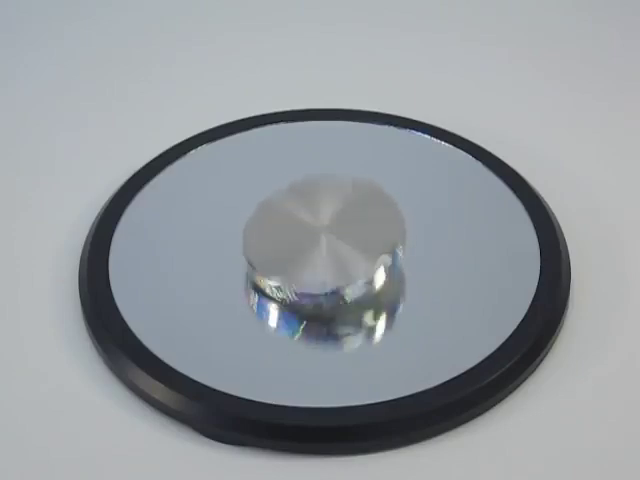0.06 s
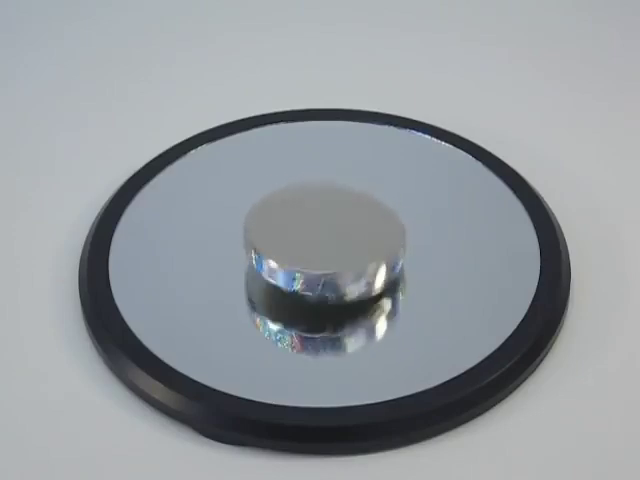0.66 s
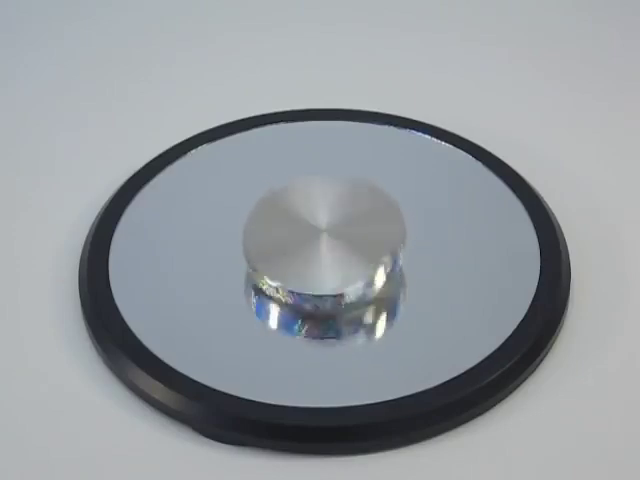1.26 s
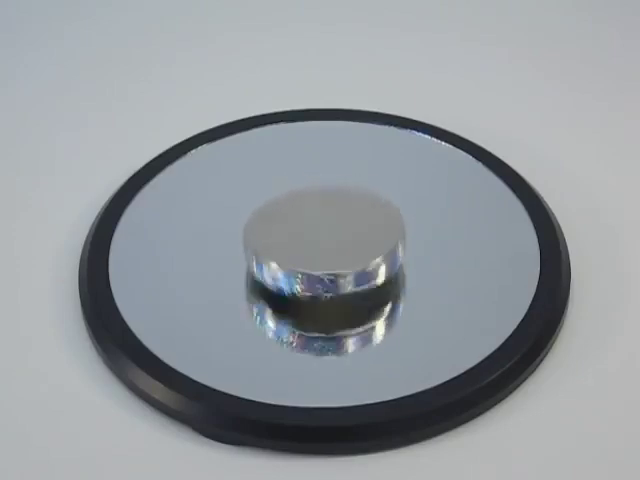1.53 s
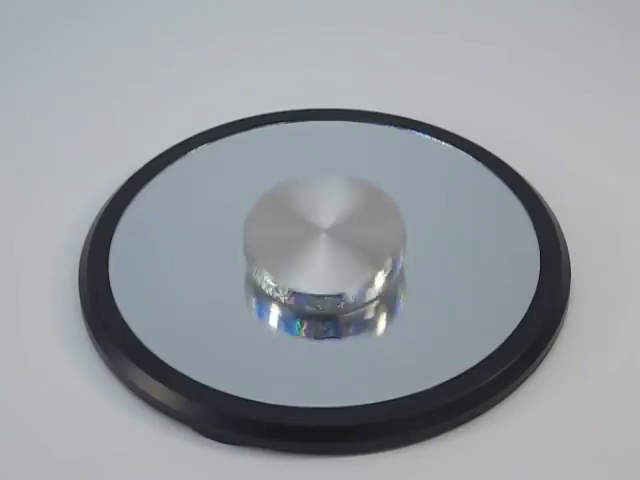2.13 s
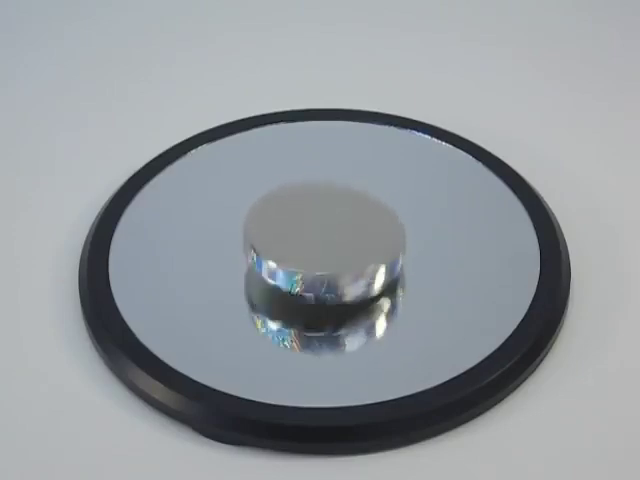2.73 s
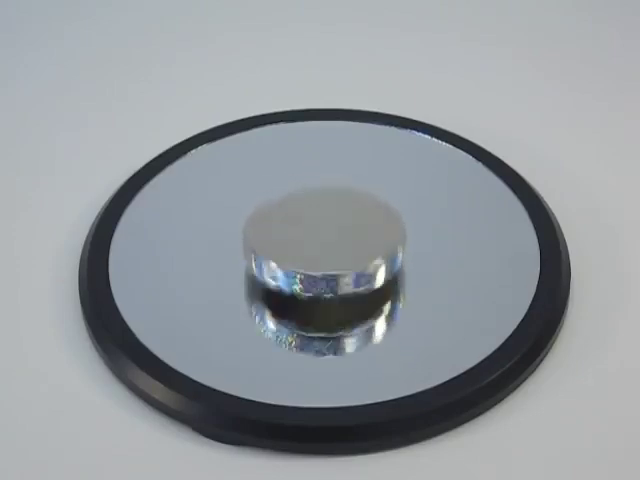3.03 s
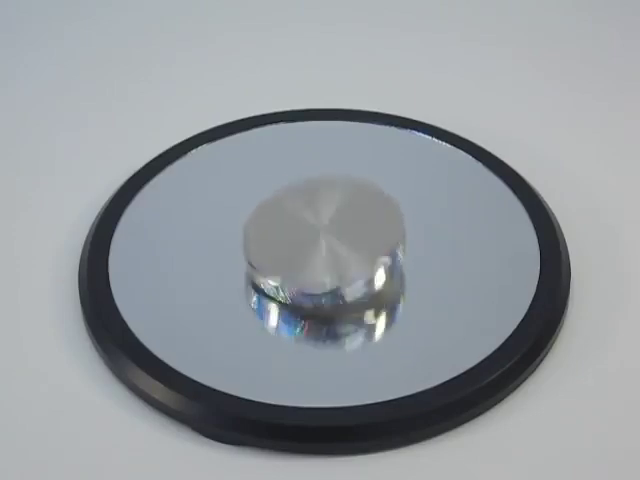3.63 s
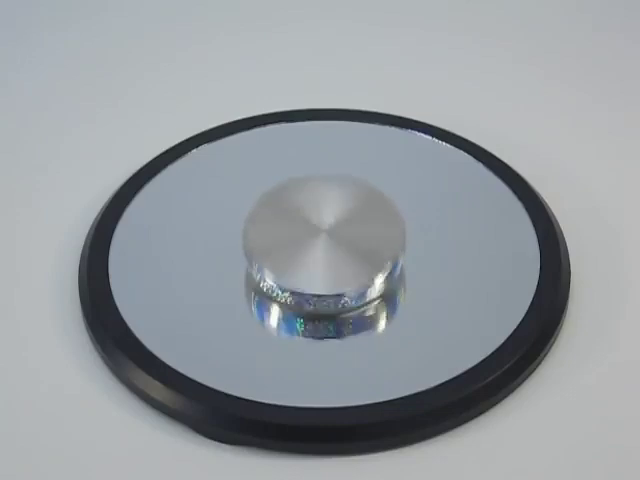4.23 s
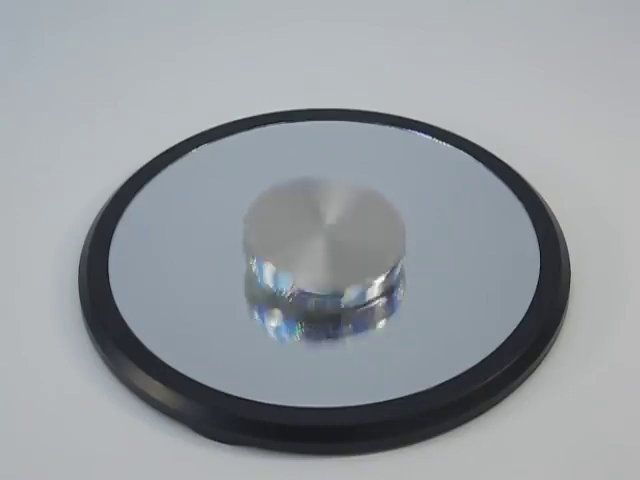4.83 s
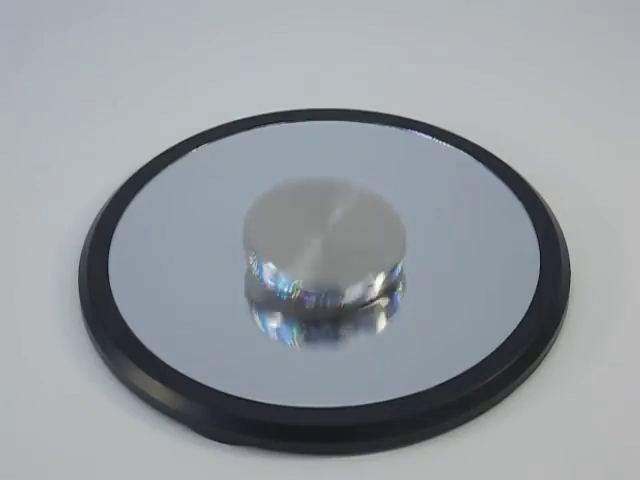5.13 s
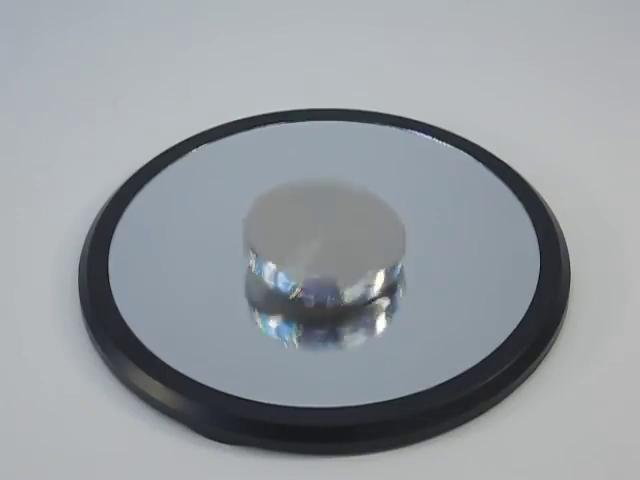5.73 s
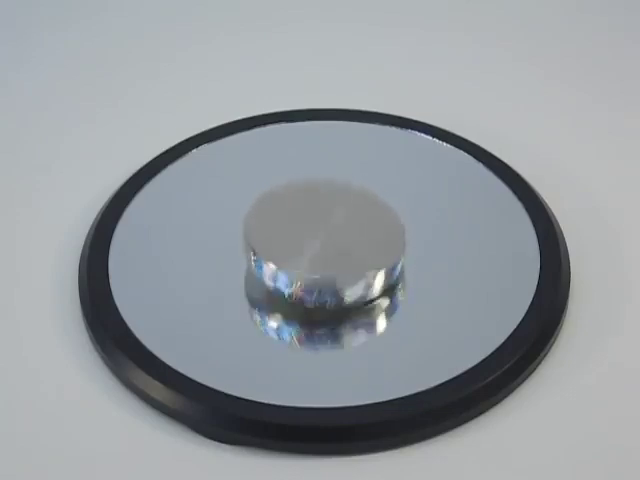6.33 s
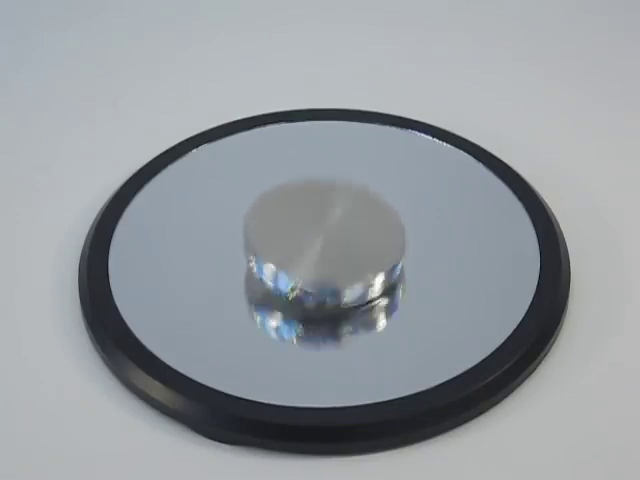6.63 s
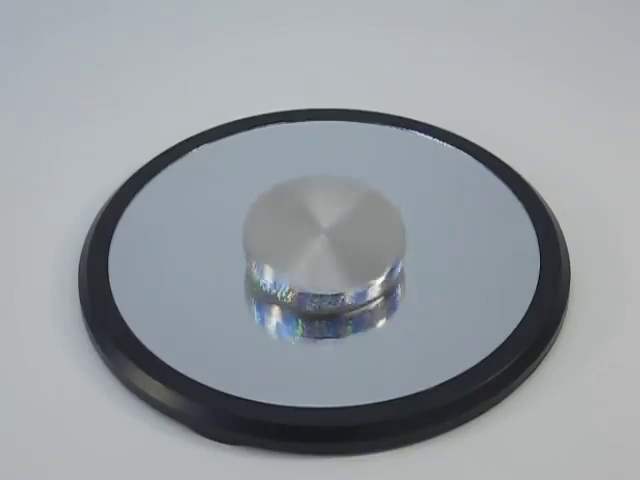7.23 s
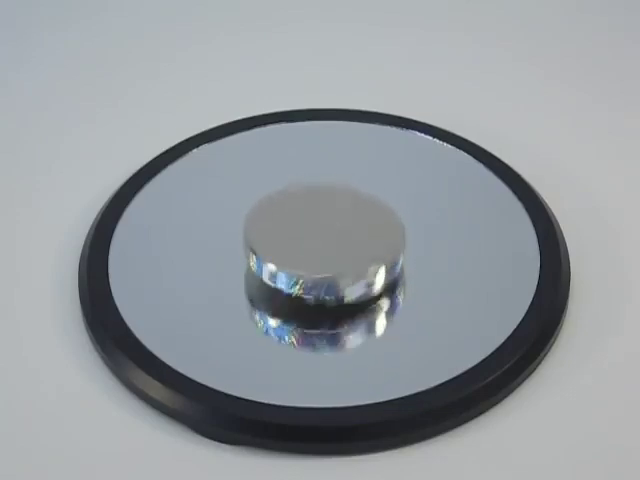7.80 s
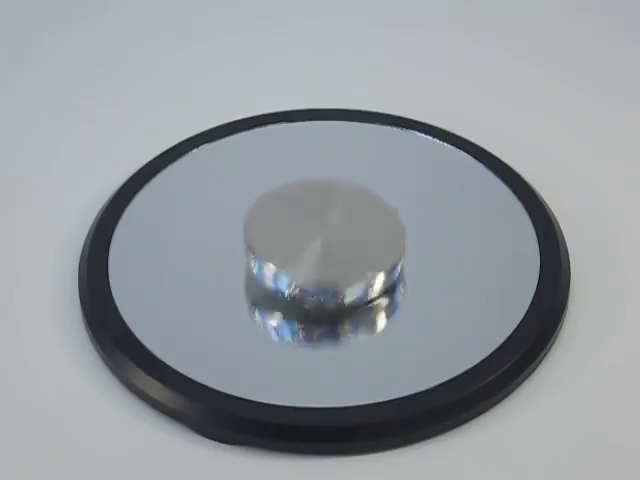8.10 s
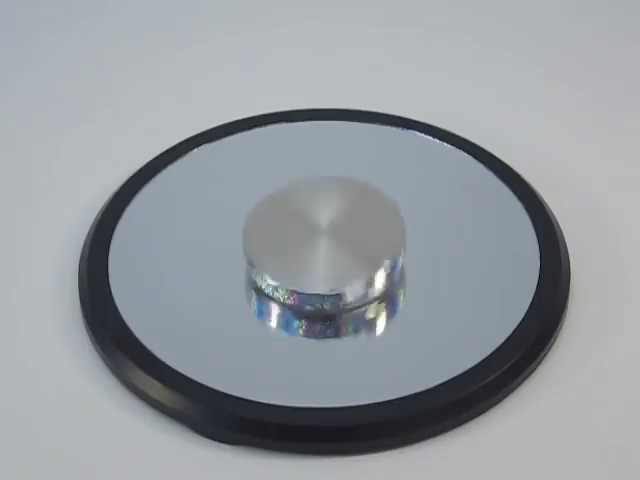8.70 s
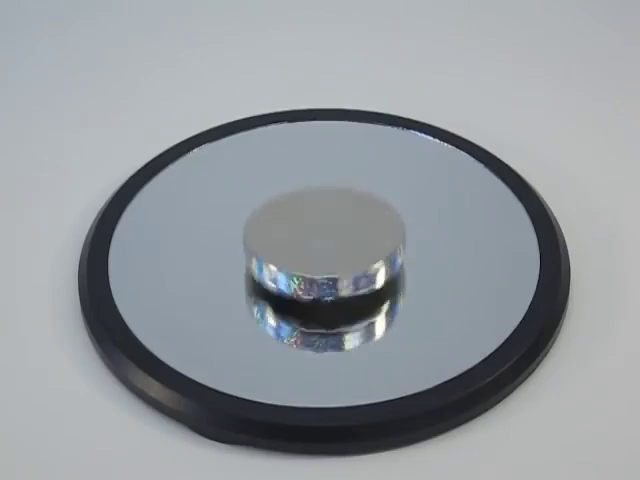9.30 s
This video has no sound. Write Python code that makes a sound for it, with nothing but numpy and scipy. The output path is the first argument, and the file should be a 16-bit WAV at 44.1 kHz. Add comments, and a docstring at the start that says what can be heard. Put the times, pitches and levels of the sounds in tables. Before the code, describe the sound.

Close, rapid metallic whirring and pulsing from a steel disc rolling round on its rim on a mirror, in a quiet room.

```python
"""First comes a fast, rasping warble: a heavy steel disc wobbling on a mirror base, close to one microphone.
Its contact circles about 13 times a second, slowly speeding up, driving the plate's modes, each loudest
at its own places on the circle, and hissing over a scuffed spot. A rough arc of the rim rasps once a turn
until the sinking disc rolls off it. Farther back lies a quiet room with a few soft bumps."""
import sys
import numpy as np
from scipy import signal
from scipy.fft import rfft, irfft, next_fast_len
from scipy.io import wavfile
from scipy.ndimage import uniform_filter1d, map_coordinates

SR = 44100
rng = np.random.default_rng(int(sys.argv[2]) if len(sys.argv) > 2 else 0)


def master(y):
    """Save y as 16-bit WAV."""
    cut = np.clip(np.atleast_2d(y).T, -1, 1)
    pcm = np.round(cut * 32767)  # scale
    wavfile.write(sys.argv[1], SR, pcm.astype(np.int16))


N = 412776
TIME = np.arange(N) / SR


def amp(db):
    """Decibels to gain."""
    return 10 ** (np.asarray(db) / 20)


def unit(x):
    """x at rms 1."""
    return x / np.sqrt(np.mean(x ** 2) + 1e-20)


def along(points, hz):
    """(Hz, value) points read on a log axis."""
    f, v = np.transpose(points)
    return np.interp(np.log(hz + 1), np.log(f + 1), v)


def white():
    """Noise of 0 dB per Hz."""
    return rng.standard_normal(N) * np.sqrt(SR / 2)


def wander(rate):
    """A smooth random curve with rate knots a second."""
    return map_coordinates(rng.standard_normal(int(TIME[-1] * rate) + 4), [TIME * rate])


def filtered(x, response):
    """x times a complex response of frequency."""
    m = next_fast_len(N + SR // 2, real=True)
    return irfft(rfft(x, m) * response(np.fft.rfftfreq(m, 1 / SR)), m)[:N]


def coloured(x, spectrum):
    """x with the gains of (Hz, dB) points."""
    return filtered(x, lambda f: amp(along(spectrum, f)))


def resonate(x, hz, width):
    """x through a steep-sided resonance."""
    return filtered(x, lambda f: (1j * f * width / (hz * hz - f * f + 1j * f * width)) ** 2)


def turns(start, rate, speed_up, growth):
    """Turns travelled by the contact, from rate turns a second, ever faster as the disc sinks."""
    return start + rate * TIME + speed_up * TIME ** 2 / 2 + growth * TIME ** 3 / 6


def patch(turn, centre, half_width, order=2):
    """1 while the contact is on a stretch of its circle, 0 away from it."""
    return np.exp(-np.abs(((turn - centre + .5) % 1 - .5) / half_width) ** order / 2)


def coupling(turn, waves, best, share):
    """How well a mode is driven as the contact crosses its crests and nodes."""
    return 1 - share + share * np.cos(2 * np.pi * round(waves) * (turn - best))


def grit(turn, spiky_db, repeat, marks_per_lap=3600):
    """Contact force of 0 dB per Hz: clumped impacts on marks that recur, renewed as the track creeps."""
    clumps = unit(uniform_filter1d(rng.standard_normal(N), size=24))
    fresh = rng.standard_normal((int(turn[-1]) + 20, marks_per_lap))
    laps = signal.lfilter([np.sqrt(1 - repeat ** 2)], [1, -repeat], fresh, axis=0)
    marks = laps.ravel()[((turn + 10) * marks_per_lap).astype(int)]
    return unit(marks * amp(spiky_db * clumps)) * np.sqrt(SR / 2)


# The room's air: f/Hz, level/dB per Hz
ROOM_AIR = [(15, -74), (35, -67.5), (60, -71), (90, -75), (160, -77.5), (250, -78), (320, -81), (520, -83),
            (1000, -86), (4000, -111.5), (15000, -108)]
# Its hum: f/Hz, level/dB
ROOM_HUM = [(53, -57.5), (120, -66.5), (263, -63)]
def room_tone():
    """All round the microphone: still air, a faint hum and a low rumble that swells once."""
    peak_s, half_length_s = 4.5, 1.57
    swell = amp(-54.5) * np.exp(-((TIME - peak_s) / half_length_s) ** 2 / 2)
    rumble = swell * unit(resonate(white(), hz=73.6, width=166))
    hum = sum(amp(db) * np.sqrt(2) * np.sin(2 * np.pi * (hz * TIME + rng.random()))
              for hz, db in ROOM_HUM)
    return coloured(white(), ROOM_AIR) + rumble + hum


# Soft bumps: t/s, f/Hz, width/Hz, envelope level/dB, t60/s
ROOM_BUMPS = [(3.805, 380, 260, -35, .3), (3.85, 200, 22, -46, .7), (5.51, 285, 22, -39, .4),
              (7.44, 1000, 900, -30, .15)]
def bumps():
    """Dull knocks, back in the room, that swell briefly and die away."""
    out = np.zeros(N)
    for start, hz, width, db, t60 in ROOM_BUMPS:
        age = np.maximum(TIME - start, 0)
        envelope = amp(db - 60 * age / t60) * (1 - np.exp(-age / 0.011))
        out += envelope * unit(resonate(white(), hz, width))
    return out


# Decay of the room: f/Hz, t60/s
WALL_DECAY = [(200, 1), (2000, 0.36), (12000, 0.54)]
def walls(x):
    """The walls' short answer reaches the microphone 5 ms late and lingers longest in the bass."""
    hz, t, spectra = signal.stft(rng.standard_normal(SR // 2), SR, nperseg=256)
    decay = amp(-60 * t / along(WALL_DECAY, hz)[:, None])
    tail = signal.istft(spectra * decay, SR, nperseg=256)[1]
    return signal.fftconvolve(x, np.pad(tail / np.linalg.norm(tail), (SR // 200, 0)))[:N]


# Waviness of the rim: waves round it, drive level/dB, beats per turn of drift, loudest drift/turn
RIM_WAVINESS = [(31, -49.5, 2, 0.25), (32, -58, 3, 0.092), (33, -49.5, 3, 0.14), (34, -57, 2, 0.28),
                (35, -50.5, 2, .3), (36, -51, 2, .3)]
def base_ring(mirror, rim):
    """Under the disc, rim waves glide up through the base's lowest mode, beating as the rim drifts."""
    drive = amp(-64.5) * grit(rim, spiky_db=2, repeat=0.7)
    for waves, db, beats, best in RIM_WAVINESS:
        beat = coupling(mirror - rim, beats, best, share=0.41)
        drive += amp(db) * beat * np.sqrt(2) * np.sin(2 * np.pi * (round(waves) * rim + rng.random()))
    return resonate(drive * coupling(mirror, 1, best=0.94, share=0.34), hz=417.2, width=35.7)


# Specks on the mirror: from t/s, to t/s, place/turn, relative level/dB
MIRROR_SPECKS = [(1.2, 4.9, .255, -25), (5.0, 7.4, .16, -23.5)]
# Colour of their click: f/Hz, level/dB
CLICK_COLOUR = [(600, -22), (1500, -1), (3000, 0), (5000, -7), (9000, -13), (15000, -19)]
def ticks(mirror, rim):
    """Specks click under the contact once a lap, and a nick in the rim adds a thin high tick."""
    blows = np.zeros(N)
    for start, stop, turn, db in MIRROR_SPECKS:
        hits = np.flatnonzero(np.diff(np.floor(mirror - turn)))
        sizes = amp(db + 13.5) * (1 + rng.uniform(-0.43, 0.74, len(hits)))
        blows[hits] += sizes * (TIME[hits] > start) * (TIME[hits] < stop)
    t = TIME[:SR // 50]
    chatter = rng.standard_normal(len(t)) * amp(-60 * t / 0.01)
    clicks = coloured(signal.fftconvolve(blows, chatter / np.linalg.norm(chatter))[:N], CLICK_COLOUR)
    nick = np.interp(TIME, [1.5, 3, 6.5, 8], [0, 1, 1, 0]) * patch(rim, centre=0.145, half_width=0.016)
    return clicks + amp(-74) * resonate(white() * nick, hz=12300, width=890)


def rough_arc(rim):
    """Roughness under the contact: the sinking disc rolls on ever less of the arc, then leaves it."""
    life_s, fade_db = 5.7, 14.5
    age = TIME / life_s
    centre = -0.011 - 0.15 * age ** 2
    half_width = np.maximum(0.19 - 0.13 * age, .03)
    return amp(-.5 - fade_db * age ** 4) * patch(rim, centre, half_width, order=3)


def reflection(x, mirror, delay_s, swing, farthest, echo):
    """A bounce off disc and mirror whose path to the microphone changes round the lap: a swooping comb."""
    lag = delay_s * (1 + swing * np.cos(2 * np.pi * (mirror - farthest)))
    return (x - echo * map_coordinates(x, [(TIME - lag) * SR])) / np.sqrt(1 + echo ** 2)


# The contact on smooth rim, rough arc and scuffed mirror: f/Hz, relative level/dB per Hz
SMOOTH_HISS = [(250, -100), (900, -80.5), (2400, -79.5), (3300, -87), (4600, -87), (5900, -87.5),
               (6500, -83), (8300, -85), (9800, -85), (11000, -87), (12600, -89.5), (14000, -91),
               (15500, -102)]
ARC_RASP = [(500, -111), (850, -69.5), (1050, -68.5), (1800, -57.5), (2400, -70.5), (3200, -72.5),
            (4000, -66), (4700, -73), (5400, -73.5), (7000, -78.5), (8000, -75.5), (10300, -84),
            (12000, -78), (15000, -98)]
SCUFF_SWISH = [(2500, -105), (4600, -81.5), (5200, -70), (5700, -75), (6200, -78), (7200, -74),
               (8300, -73.5), (9500, -83), (12000, -132), (15500, -105)]
def hiss(mirror, rim, rough):
    """Close up: fine hiss, the arc's rasp, and a swish over the scuff, strongest when the arc meets it."""
    all_round = coupling(mirror, 1, best=0.14, share=0.15)
    smooth = coloured(grit(rim, spiky_db=3, repeat=0.68) * all_round, SMOOTH_HISS)
    bite = 0.76 + 0.47 * patch(mirror, centre=0.042, half_width=0.038)
    rasp = coloured(grit(rim, spiky_db=1.5, repeat=0.9) * rough * bite, ARC_RASP)
    scuff = patch(mirror, centre=0.078, half_width=0.047)
    scuff += 0.32 * patch(mirror, centre=0.86, half_width=0.04)
    swish = coloured(grit(mirror, spiky_db=0.5, repeat=0.65) * scuff * (1 + 1.54 * rough), SCUFF_SWISH)
    return swish + reflection(smooth + rasp, mirror, delay_s=0.000561, swing=0.12, farthest=0.66, echo=0.35)


# Bright modes: f/Hz, width/Hz, relative level/dB, crest/turn, half width/turn
BRIGHT_MODES = [(4070, 190, -36, -0.36, 0.059), (3575, 310, -37, -.08, 0.051),
                (2810, 410, -39, 0.19, 0.061)]
def bright_ring(mirror, rough):
    """The rough arc rings each bright mode where it passes over that mode's crest."""
    return rough * sum(amp(db) * patch(mirror, turn, half_width) * unit(resonate(white(), hz, width))
                       for hz, width, db, turn, half_width in BRIGHT_MODES)


# Rippled stretches of the mirror: f/Hz, pitch spread/Hz, relative level/dB, place/turn, half width/turn
MIRROR_RIPPLES = [(1465, 50.2, -37, 0.61, 0.084), (1432, 60.2, -39, 0.068, 0.097),
                  (1960, 110.5, -40.5, 0.83, 0.042), (1855, 110, -45.5, 0.33, 0.059),
                  (1797, 80, -45, .1, 0.029), (2122, 100, -43, .28, 0.047), (655, 69.8, -54, 0.74, 0.066),
                  (3970, 250, -51.5, 0.656, 0.052), (4250, 250, -52, 0.22, 0.05)]
def singing(mirror, force):
    """Each rippled stretch draws a short note from the plate, so that the lap warbles."""
    out = np.zeros(N)
    for hz, spread, db, turn, half_width in MIRROR_RIPPLES:
        pitch = hz + spread / 2 * wander(rate=120)
        envelope = amp(db + 1.5 * wander(rate=3.03)) * patch(mirror, turn, half_width)
        out += envelope * np.sqrt(2) * np.sin(2 * np.pi * np.cumsum(pitch) / SR)
    rise_db = np.interp(TIME, [0, 3.5, 7.5], [-3, -1, 1.5])  # the flatter the disc, the more it sings
    return force * out * amp(rise_db)


# Modes of the steel plate: f/Hz, width/Hz, relative level/dB per Hz, waves round the circle,
# best driven at/turn, share that depends on place/0-1
PLATE_MODES = [(661.5, 110, -72.5, 1, 0.58, 0.28), (940, 54, -74.5, 1, 0.023, 0.95),
               (1025.5, 59, -65.5, 1, 0.18, 0.1), (1077, 53, -71.5, 1, 0.067, 0.06),
               (1201, 42, -64.5, 1, 0.39, 0.52), (1333, 130, -67, 1, 0.016, 0.97),
               (1446, 83, -58, 1, 0.566, 0.77), (1485, 226, -65.5, 1, 0.53, 0.71),
               (1510, 260, -67.5, 1, 0.016, 0.81), (1810, 206, -65.5, 1, 0.18, 0.57),
               (1875, 220, -63, 2, 0.31, 0.74), (1948, 250, -69.5, 1, 0.82, 0.84),
               (2066, 135, -65.5, 1, .31, 0.93), (2166, 115, -74.5, 1, 0.086, 0.22),
               (2782, 410, -78, 1, 0.14, 0.85), (3280, 270, -76, 1, 0.11, 0.77),
               (3685, 310, -78.5, 1, 0.017, 0.68), (3957, 310, -74.5, 1, 0.65, 0.63),
               (4240, 430, -80.5, 1, 0.36, 0.26), (4600, 270, -78, 1, 0.86, 0.5),
               (4826, 190, -77.5, 1, 0.45, 0.52), (5460, 570, -83, 1, 0.49, 1),
               (9740, 790, -82, 1, 0.31, 0.78), (12300, 1800, -86, 1, 0.46, 0.36)]
def plate(mirror, rim, force, rough):
    """Nearest the microphone: marks on rim and mirror ring the modes, each swelling where best driven."""
    drives = []
    for _ in range(3):
        marks = grit(rim, spiky_db=1, repeat=0.96) + 0.7 * grit(mirror, spiky_db=1, repeat=0.96)
        drives.append(0.77 * force * marks)
    out = np.zeros(N)
    for k, (hz, width, db, waves, best, share) in enumerate(PLATE_MODES):
        # the arc's fine grain hardly stirs the lowest mode
        stir = np.interp(hz, [650, 950, 1490, 2130, 2700, 5000], [0.24, 1.35, 0.98, 0.88, 1.16, 1.0])
        drive = drives[k % len(drives)] * (1 + 1.42 * rough * stir)
        out += amp(db) * resonate(drive * coupling(mirror, waves, best, share), hz, width)
    return out


def scene():
    """The disc on its base in front, the room well behind."""
    slip = .003 * wander(rate=2)  # no lap is quite as long as the last
    # the contact's place on the mirror and on the rim, in turns
    mirror = turns(start=-.560, rate=12.3162, speed_up=.14316, growth=.00855) + slip
    rim = turns(start=-.293, rate=11.7606, speed_up=.15663, growth=.00801) + slip
    rough = rough_arc(rim)
    force = amp(.5 - 0.1026 * TIME)  # the rolling force slowly ebbs
    disc = plate(mirror, rim, force, rough) + singing(mirror, force) + bright_ring(mirror, rough)
    disc += force * hiss(mirror, rim, rough) + ticks(mirror, rim)
    return (disc + amp(-15.5) * walls(disc) + base_ring(mirror, rim) + bumps() + room_tone())[None]


def record(dry):
    """One microphone into a recorder that keeps nothing above 15750 Hz."""
    return filtered(dry[0], lambda f: f < 15750)[None]


dry = scene()
out = record(dry)
master(out)
```